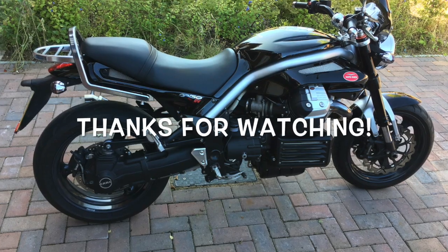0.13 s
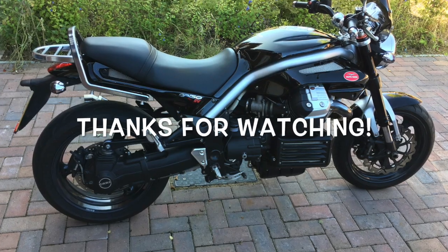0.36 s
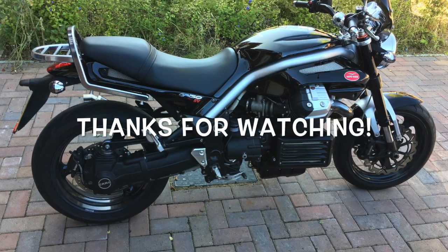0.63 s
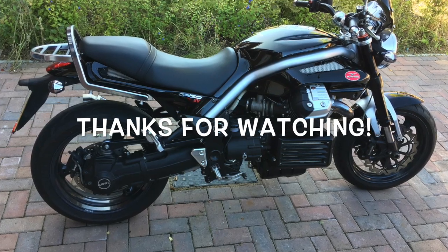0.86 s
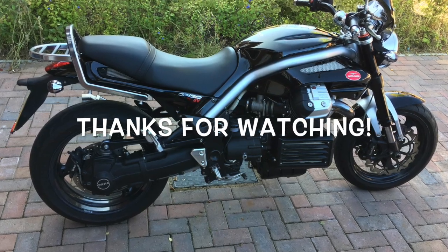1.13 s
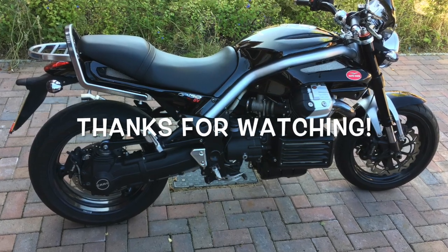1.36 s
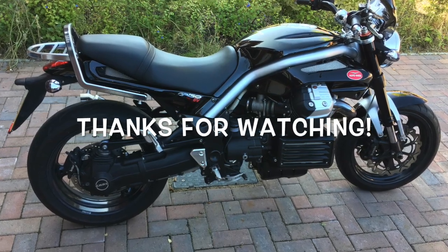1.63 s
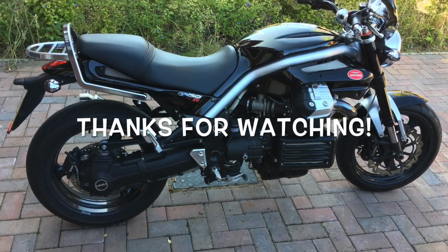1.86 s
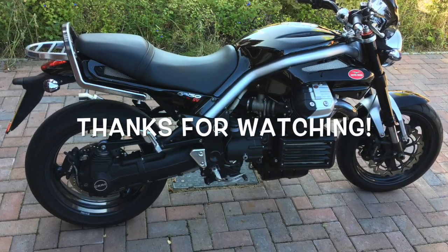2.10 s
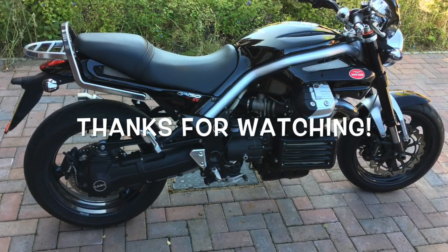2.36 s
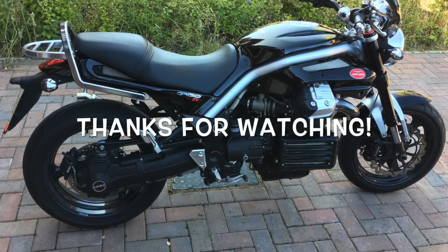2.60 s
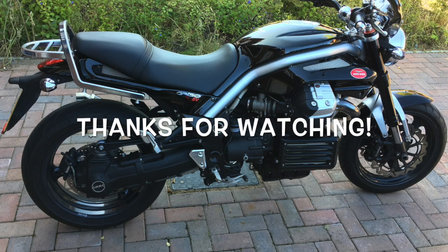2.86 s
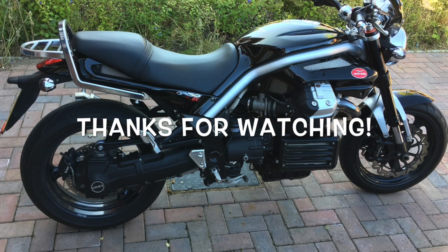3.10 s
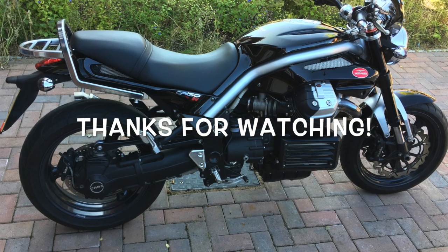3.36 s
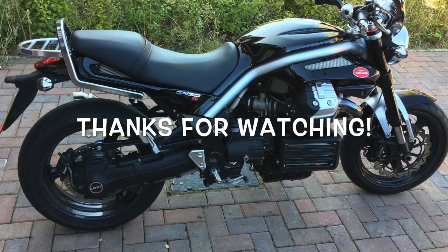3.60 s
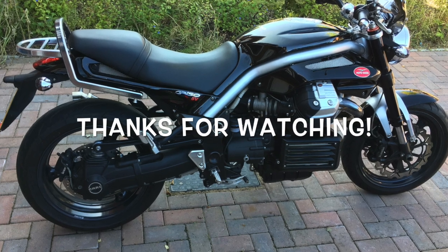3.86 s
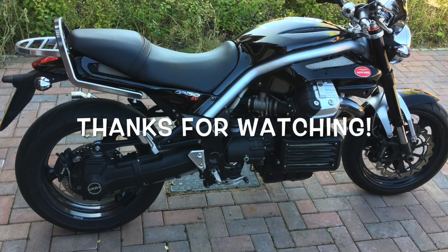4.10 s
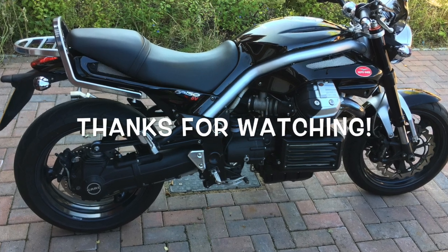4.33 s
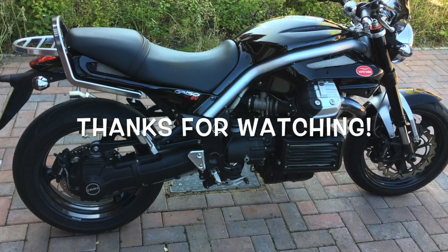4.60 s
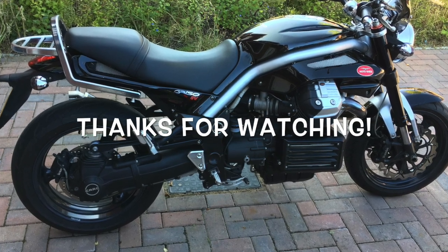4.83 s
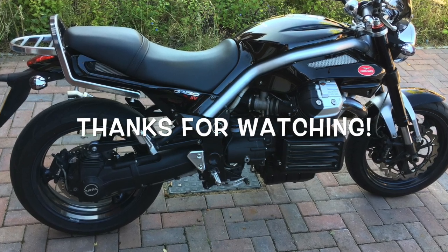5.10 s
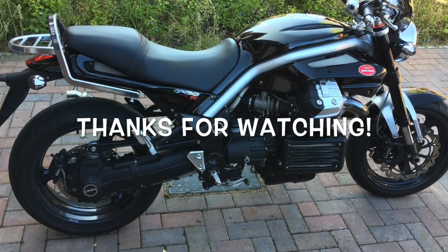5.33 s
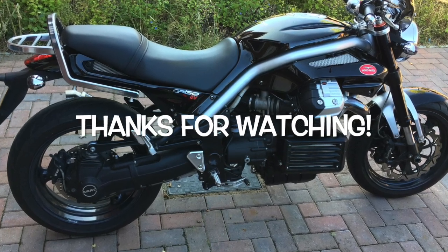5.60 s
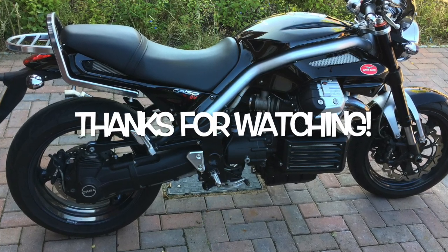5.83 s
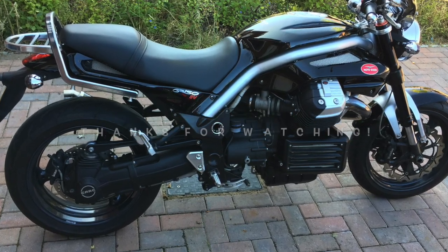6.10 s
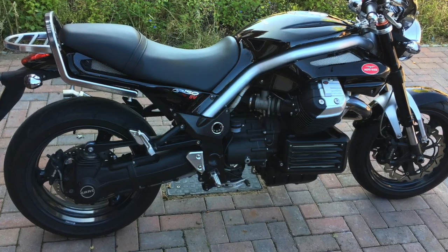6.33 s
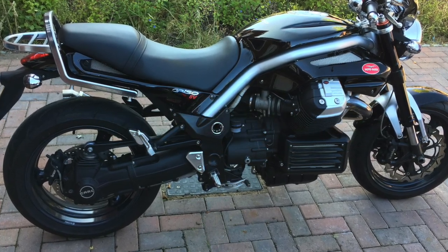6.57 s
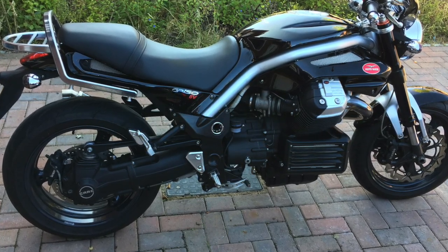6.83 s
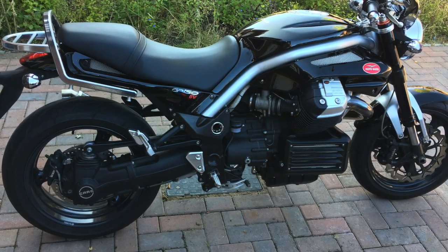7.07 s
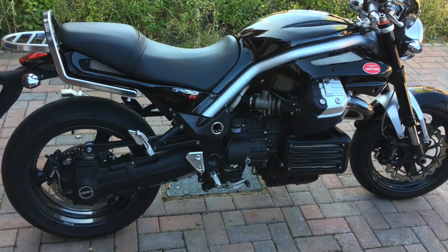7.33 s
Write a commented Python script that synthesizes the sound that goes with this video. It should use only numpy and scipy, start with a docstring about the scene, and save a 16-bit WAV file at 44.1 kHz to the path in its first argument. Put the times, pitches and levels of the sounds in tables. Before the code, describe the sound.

Deep, uneven motorcycle exhaust: two short throaty revs with popping run-downs, settling into a thumping, ticking idle that gradually fades out.

```python
"""Motorcycle blips and idle

A big V-twin engine runs down, gets two blips of the throttle, runs down again and idles lumpily until it fades.
Each exhaust stroke puffs from the outlet and rings the silencer; bursts of noise make the gas bark and hiss. A
growl pulse rings the airbox just before each beat, noise makes the intake air rasp, and valves tick over a
whirr of chains and gears."""
import sys
import numpy as np
from scipy import signal
from scipy.fft import rfft, irfft
from scipy.io import wavfile
from scipy.ndimage import uniform_filter1d

SR = 44100
rng = np.random.default_rng(int(sys.argv[2]) if len(sys.argv) > 2 else 0)


def bounce(signal):
    """Save signal as a 16-bit WAV file at the path given by the first command-line argument."""
    frames = np.transpose(np.atleast_2d(signal))
    limited = np.clip(frames, -1, 1)
    pcm = np.round(limited * 32767).astype(np.int16)
    wavfile.write(sys.argv[1], SR, pcm)


def gain_from_db(level_db):
    """Turn a decibel level (scalar or array-like) into a linear amplitude factor."""
    decades = np.asarray(level_db, float) / 20
    return 10 ** decades


N = 328545
TIME = np.arange(N) / SR  # seconds
SECOND_SHARE = .385  # the second cylinder follows the first after this share of a cycle

# Engine speed: two blips with their run-downs, then an idle that hunts a little.
# Each row: time in seconds, speed in rpm.
ENGINE_SPEED = [(0.15, 2565), (0.23, 2617), (0.42, 2137), (0.71, 2094), (0.87, 3031), (1.14, 2695),
                (1.36, 2205), (1.58, 2018), (1.9, 3138), (2.39, 2105), (2.86, 1649), (3.14, 1466),
                (4.02, 1158), (4.32, 1117), (4.75, 1218), (5.52, 1152), (5.64, 1142), (5.96, 1194),
                (6.63, 1164), (7.1, 1127)]


def curve(table):
    """Draws each column of a table smoothly over time; the first column is in seconds."""
    s, *columns = np.transpose(table)
    return [np.interp(TIME, s, c) for c in columns]


def noise(colour, lo_hz, hi_hz):
    """Noise of a given colour, falling steeply under its first point; rms 1 between lo and hi."""
    hz, db = np.transpose(colour)
    f = np.arange(N // 2 + 1) * SR / N + 1  # 1 Hz up, so that the logarithm exists
    under = np.minimum(f / hz[0], 1) ** 3
    colour_gain = gain_from_db(np.interp(np.log(f), np.log(hz), db))
    spectrum = rfft(rng.standard_normal(N)) * under * colour_gain
    band = (f > lo_hz) & (f < hi_hz)
    return irfft(spectrum, N) * N / np.sqrt(2 * np.sum(np.abs(spectrum[band]) ** 2))


def clicks(s, gain):
    """One impulse, a single sample long, at each time in seconds."""
    out = np.zeros(N)
    at = np.round(s * SR).astype(int)
    inside = (at >= 0) & (at < N)
    np.add.at(out, at[inside], gain[inside])
    return out


def ring(x, modes):
    """Strikes a body with x: each mode is a sine that dies away at its own pace."""
    t = TIME[:SR // 3]
    # t60 is the time to fall by 60 dB, a factor of 1000
    body = sum(g * np.sin(2 * np.pi * hz * t) * 1000. ** (-t / t60) for hz, g, t60 in modes)
    return signal.fftconvolve(x, body)[:N]


def walk(rate):
    """Random levels, a new one rate times a second, joined by straight slopes; spread near 1."""
    k = int(SR / rate)
    held = np.repeat(rng.standard_normal(N // k + 1), k)
    return 0.82 * uniform_filter1d(held, k)[:N]


def cycles():
    """Start and length in seconds of every engine cycle, which is two turns of the crank."""
    first_beat = .57  # share of a cycle that passes before the first beat
    rpm = curve(ENGINE_SPEED)[0]
    turned = np.cumsum(rpm) / (120 * SR) - first_beat  # cycles done so far
    start = np.interp(np.arange(int(turned[-1]) + 1), turned, TIME)
    length = np.append(np.diff(start), start[-1] - start[-2])
    return start, length


def valve_gear(start, length):
    """Valves seat near fixed crank angles and ring the covers; chains and gears whirr between."""
    # Ringing of the covers. Each row: pitch in Hz, strength, time to fall 60 dB in seconds.
    covers = [(2090, 0.8, 0.058), (2163, 0.73, 0.02), (2340, 0.5, 0.022), (2430, 0.58, 0.03),
              (1620, 1, 0.058), (1180, 0.4, 0.022)]
    # Valves seating within a cycle. Each row: share of the cycle, level in dB against each other.
    valves = [(0.206, -1.5), (0.444, -4.5), (0.594, -4.5), (0.821, -7.5), (0.904, -0.5)]
    # Loudness over time, before small trims. Each row: time in seconds, ticks in dB, whirr in dB.
    gear = [(0, -53, -48), (.6, -40, -52), (.9, -45, -48), (1.8, -44.5, -49.5), (2.5, -45, -52),
            (2.9, -37.5, -48), (3.5, -36.5, -46.5), (5.2, -36, -48)]
    # Colour of the whirr. Each row: frequency in Hz, level in dB for each Hz of width.
    whirr_colour = [(290, 20), (430, 2), (650, 0.5), (1100, 14.5), (1900, 13.5), (2300, 15), (2800, 0),
                    (3900, -0.5), (5000, -2), (5500, 2.5), (7800, -12), (11000, -13), (16000, -25.5)]
    tick_db, whirr_db = curve(gear)
    share, db = np.transpose(valves)
    chance = rng.standard_normal((len(start), len(valves), 2))
    s = start[:, None] + length[:, None] * (share + .005 * chance[..., 0])
    blows = clicks(s.ravel(), gain_from_db(db + 2.64 * chance[..., 1]).ravel())
    # a seating is a soft 5 ms push at the covers' pitch with a little rattle on it
    t = TIME[:SR // 200]
    push = np.sin(np.pi * t / t[-1]) ** 2
    soft = signal.fftconvolve(blows, push * np.sin(2 * np.pi * 2150 * t))[:N]
    rattle = 0.71 * signal.fftconvolve(blows, push)[:N] * rng.standard_normal(N)
    ticks = ring(soft + rattle, covers)
    ticks = ticks / np.std(ticks) * gain_from_db(tick_db + 1)
    # the whirr flutters slowly and quickly
    whirr_gain = gain_from_db(whirr_db + 0.73 * walk(60) + 4.0 * walk(250) + 0.84)
    return ticks + whirr_gain * noise(whirr_colour, 2810, 7560)


def intake(start, length):
    """A growl pulse rings the airbox just before each beat; past the closing throttle the air rasps."""
    # Growl of the airbox, low mode then high. Each row: pitch in Hz, strength,
    # time to fall 60 dB in seconds.
    airbox = [(215.4, 1, 0.048), (316, 0.92, 0.033)]
    # Loudness over time. Each row: time in seconds, low mode in dB, high mode in dB, rasp in dB.
    intake_levels = [(.6, -28.5, -26.5, -62), (.8, -8.5, -28, -66), (.9, -37, -12.5, -51),
                     (1.1, -29, -29, -48), (1.4, -32, -20, -74), (1.6, -21.5, -30, -76),
                     (1.78, -10.5, -18, -71), (1.95, -41.5, -27, -36.5), (2.15, -31, -23.5, -54),
                     (2.6, -27.5, -30.5, -79), (3.2, -26, -44.5, -74)]
    # Colour of the rasp. Each row: frequency in Hz, level in dB for each Hz of width.
    rasp_colour = [(2600, -34), (3500, -0.5), (5800, -14.5), (6800, -17.5)]
    low_db, high_db, rasp_db = curve(intake_levels)
    # a pulse strikes the airbox .93 of a cycle after each cylinder's beat
    s = np.r_[start + .93 * length, start + (.93 + SECOND_SHARE) * length]
    pulses = clicks(s, gain_from_db(1.65 * rng.standard_normal(len(s))))
    low = gain_from_db(low_db) * ring(pulses, airbox[:1])
    high = gain_from_db(high_db) * ring(pulses, airbox[1:])
    rasp = gain_from_db(rasp_db + 5.2 * walk(220)) * noise(rasp_colour, 3000, 6500)
    return low + high + rasp


def beats(start, length):
    """Sets both cylinders' beat times, cycle lengths and puff, ring, hiss and bark levels from speed and throttle."""
    # Throttle shut: levels follow speed. Each row: speed in rpm, then outlet puff,
    # silencer ring, gas hiss and gas bark in dB.
    shut_levels = [(1174, -18, -15.5, -45, -33.5), (1335, -14, -16, -45, -30.5),
                   (1561, -14.5, -28.5, -51, -35.5), (1620, -23, -25, -56, -33.5),
                   (2020, -23, -28, -49.5, -29.5), (2587, -18, -34.5, -47.5, -25.5),
                   (2750, -13, -42, -42.5, -20.5), (3100, -16, -56.5, -43, -19.5)]
    # Throttle open: puff, ring, hiss and bark in dB.
    open_db = [-8.5, -19, -34, -15.5]
    # Just after the throttle snaps shut: change of puff, ring, hiss and bark in dB.
    lull_db = [-3.5, -20, -6, -6.5]
    # Blips. Each row: opening, shutting and end of the lull in seconds,
    # strength in dB, change of the puff by the end in dB.
    blips = [(0.672, 0.86, .95, -1, -3.5), (1.65, 1.83, 1.875, -1.5, -4.5)]
    # Weak beats, mostly charges that hardly burn. Each row: time in seconds,
    # change of puff and ring in dB, change of hiss and bark in dB.
    weak = [(.487, -5, -34), (1.225, 1, -1.5), (1.246, -7, -2), (1.4, -3, -33), (1.455, -1, -5),
            (2.191, -2, -20), (2.298, 2, 1), (2.517, -2, -28), (2.59, -5, -13), (2.696, -4, -11),
            (2.98, -10, -20), (3.135, -4, -4), (3.699, -3.5, -5), (3.993, -1.5, -9), (4.096, -2, -7),
            (4.307, -4, -6), (5.219, -3.5, -22), (6.243, -4, -6), (6.757, -1, -1)]
    # Beats that mostly come hard, most with a crack in the pipe; columns as for the weak ones.
    cracks = [(.013, 3.5, 2.5), (0.04, 2, 3.5), (0.076, 0, 4.5), (.329, -1, 6.5), (.606, 0, 7.5),
              (0.655, 4, 4), (.693, 1.5, 3), (.715, 1.5, 2.5), (.749, 0, 4.5), (0.798, 2, 5),
              (0.842, 2, 0.5), (1.021, 2, 6), (1.274, 5, 7), (1.326, 5.5, 6.5), (1.425, 5, 8.5),
              (1.576, 0, 7.5), (1.603, 6.5, 6), (1.629, 7, 7), (1.662, -0.5, 4), (1.683, -0.5, 2),
              (1.714, -3, 5), (1.762, 4, 6), (1.805, -1, -0.5), (1.817, 0.5, -0.5), (2.229, 0, 4.5),
              (2.28, 2, 5.5), (2.333, 0, 6.5), (2.433, 4.5, 5), (2.466, -3, 7), (2.502, 5.5, 5),
              (2.616, 6.5, 5.5), (2.653, -1.5, 6), (2.719, 0.5, 0), (2.778, 2, 3), (2.861, -4, 11),
              (2.895, 6, 6), (2.932, 1.5, 7.5), (3.017, -3.5, 1), (3.087, 1.5, 4), (3.175, -5, 3.5),
              (3.252, 2.5, 6), (3.344, -4.5, 2.5), (3.425, 2, 3), (4.202, 2, 5), (4.414, 2.5, 5),
              (4.782, 1, 2.5), (5.08, -1.5, 1)]
    # Spread from beat to beat, first row at idle, second above lean_rpm.
    # Each row: puff, ring and gas in dB.
    scatter_db = [(.8, .6, 1.5), (.7, 1.5, 2.2)]
    # The second cylinder's extra; rows and columns as for the spread.
    second_db = [(-1.5, 4.5, 0), (2.5, 8, -1.5)]
    lean_rpm = 1492  # above this the shut throttle starves the charges
    ring_sag = 3.9  # through a blip the ring sinks this many times faster than the puff
    catch_s, catch_db = .05, 1.5  # charges burn harder this long before the gas roars; ring gain

    s = np.ravel(np.c_[start, start + SECOND_SHARE * length])  # the cylinders take turns
    long = np.repeat(length, 2)
    rpm = np.interp(s, *np.transpose(ENGINE_SPEED))
    lean = 1 * (rpm > lean_rpm)  # picks the row for this speed
    speeds, *levels = np.transpose(shut_levels)
    db = np.array([np.interp(rpm, speeds, c) for c in levels]).T
    for opens, shuts, lull_ends, blip_db, sag_db in blips:
        wide = (s > opens) & (s < shuts)
        sag = sag_db * (s[wide] - opens) / (shuts - opens)
        db[wide] = np.add(open_db, blip_db) + np.outer(sag, [1, ring_sag, 0, 0])
        db[(s >= shuts) & (s < lull_ends)] += lull_db
        db[(s > opens - catch_s) & (s <= opens), 1] += catch_db
    change = rng.standard_normal((len(s), 3)) * np.array(scatter_db)[lean]
    # the nearest beat moves to each listed time and takes the listed change
    for when, thump_db, gas_db in weak + cracks:
        k = np.argmin(np.abs(s - when))
        s[k] = when
        change[k] = [thump_db, thump_db, gas_db]
    change[1::2] += np.array(second_db)[lean[1::2]]
    puff, boom, hiss, bark = (db + change[:, [0, 1, 2, 2]]).T  # hiss and bark share the gas change
    return s, long, puff, boom, hiss, bark


def gust(s, db, slow, rise, fall, echo_s, echo_db):
    """Outlet flow swells and dies, longer at low speed; the wave returning down the pipe pushes again."""
    size = SR // 10
    flow = np.zeros(N + 3 * size)  # spare room at both ends
    for when, gain, k in zip(s, gain_from_db(db), slow):
        t = TIME[:size]
        shape = gain * (1 - np.exp(-t / (rise * k))) * np.exp(-t / (fall * k))
        for lag, share in ((0, 1), (echo_s, gain_from_db(echo_db))):
            at = size + int((when + lag) * SR)
            flow[at:at + size] += share * shape
    return flow[size:size + N]


def exhaust(s, length, puff, boom, hiss, bark):
    """Puff and ring carry the thump; turbulent gas rides on the front of each beat."""
    # Puff at the outlet. Each row: pitch in Hz, strength (a minus starts the swing
    # the other way), time to fall 60 dB in seconds.
    outlet = [(58.4, -1.26, .08), (96.1, 2.1, .04), (160.8, -.43, .07), (345.5, -.084, .079)]
    # Ringing of the silencer; columns as for the outlet.
    silencer = [(50.3, -.3, .3), (90.3, 1.1, .145), (107.8, -.64, .233), (146.2, -.094, .233),
                (254.3, .09, .065), (291.0, .13, .09)]
    # Colours of the gas. Each row: frequency in Hz, level in dB for each Hz of width.
    bark_colour = [(450, -4), (650, -12), (836, -1.5), (1350, -3.5), (1480, -10), (1620, -4), (2380, -22.5),
                   (2700, -37), (3760, -17), (5520, -27.5), (7000, -37.5)]
    hiss_colour = [(2600, -14.5), (3760, 0.5), (5520, 4.5), (7680, -9.5), (8740, -2), (10500, -6.5),
                   (13800, -2.5), (16000, -4)]
    # both start a few milliseconds ahead of the beat's time
    puffs = ring(clicks(s - .0067, gain_from_db(puff)), outlet)
    booms = ring(clicks(s - .0081, gain_from_db(boom)), silencer)
    slow = length / .05  # 1 for a cycle of 50 ms, more at lower speed
    # the valve opens ahead of the beat, and longer ahead at low speed
    opens = s - 0.00715 * slow ** 0.56
    hiss_flow = gust(opens, hiss + 4.8, slow ** 0.18, 0.0011, 0.008, 0.024, -21)
    bark_flow = gust(opens, bark + 3.25, slow ** 1.17, 0.0013, 0.0069, 0.023, -22.5)
    # random flutter roughens both flows
    hisses = hiss_flow * gain_from_db(1.64 * walk(700)) * noise(hiss_colour, 5550, 12500)
    barks = bark_flow * gain_from_db(1.1 * walk(300)) * noise(bark_colour, 803, 2200)
    return puffs + booms + hisses + barks


def scene():
    """Adds valve gear, intake and exhaust, all driven by the same engine cycles, in one channel."""
    start, length = cycles()
    bike = valve_gear(start, length) + intake(start, length)
    bike = bike + exhaust(*beats(start, length))
    return bike[None]


def roll_off(x):
    """The treble ends steeply here."""
    return signal.sosfilt(signal.butter(12, 16990, fs=SR, output="sos"), x)


def record(dry):
    """A phone flattens the loudest peaks and cuts the top; the sound is faded out."""
    # The gain runs down evenly from the first time to the second, both in seconds.
    fade_s = (5.405, 7.396)
    flattened = dry / (1 + (np.abs(dry) / .52) ** 5) ** (1 / 5)  # never passes .52
    top_cut = signal.ellip(8, .2, 45, 15900, fs=SR, output="sos")  # steep low-pass, 15900 Hz
    finished = signal.sosfilt(top_cut, flattened) * np.interp(TIME, fade_s, [1, 0])
    return roll_off(finished)


dry = scene()
out = record(dry)
bounce(out)
```